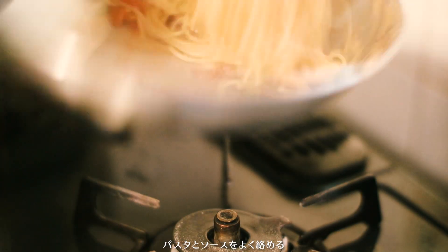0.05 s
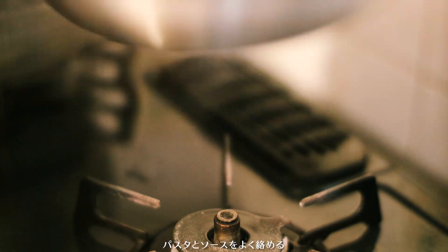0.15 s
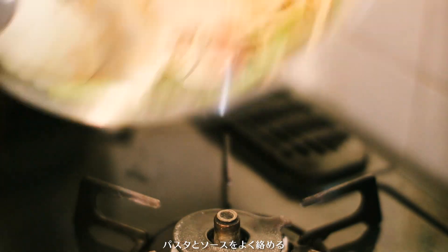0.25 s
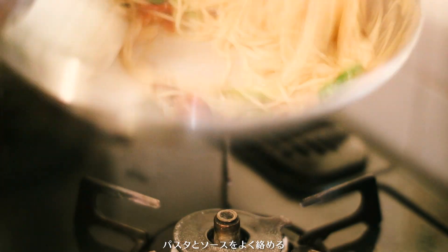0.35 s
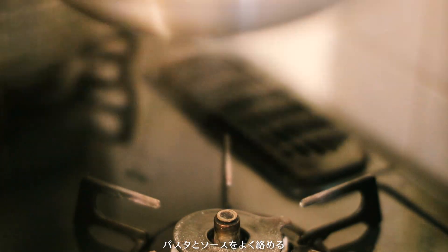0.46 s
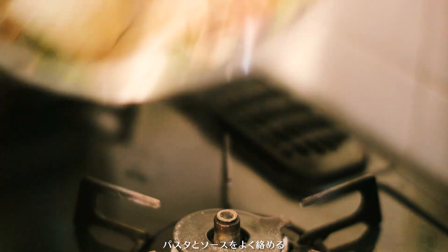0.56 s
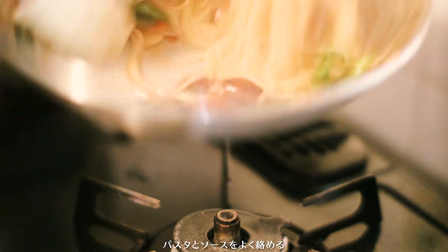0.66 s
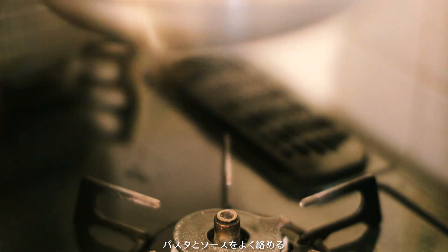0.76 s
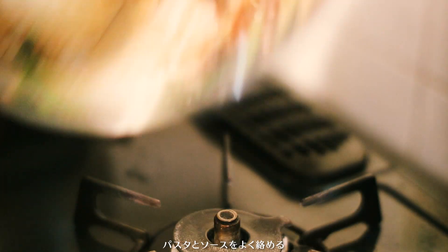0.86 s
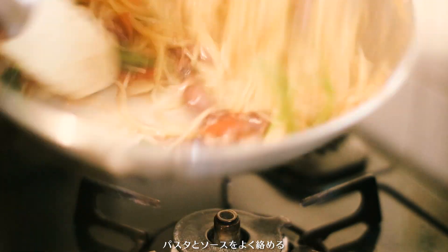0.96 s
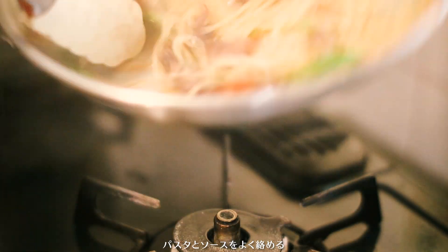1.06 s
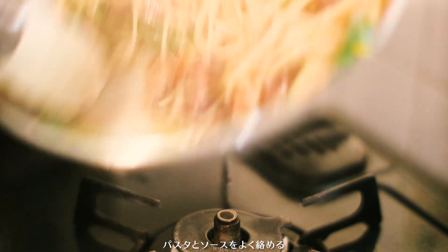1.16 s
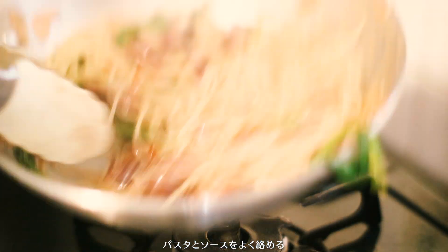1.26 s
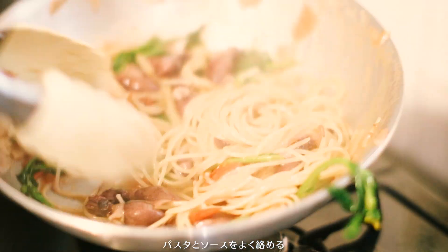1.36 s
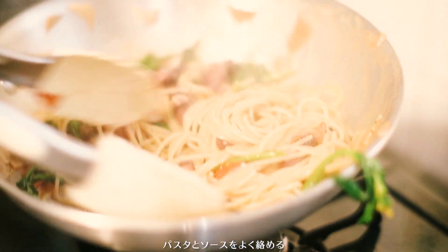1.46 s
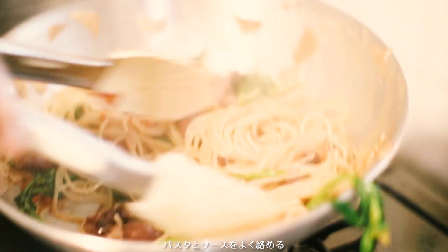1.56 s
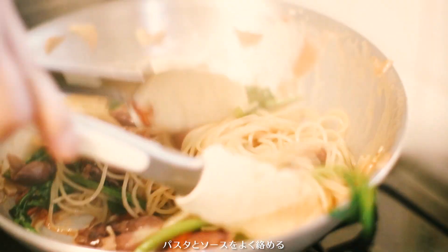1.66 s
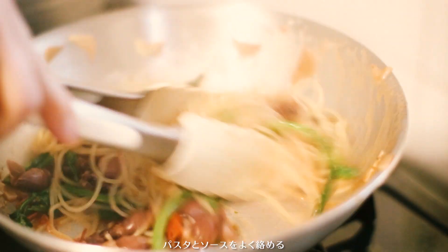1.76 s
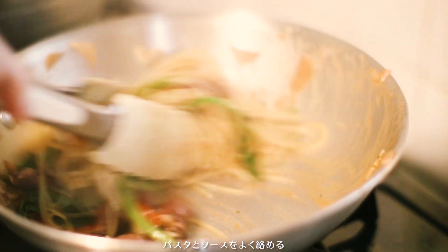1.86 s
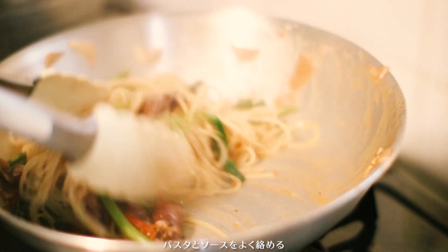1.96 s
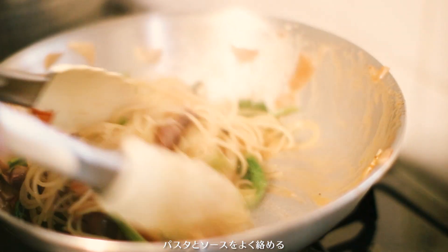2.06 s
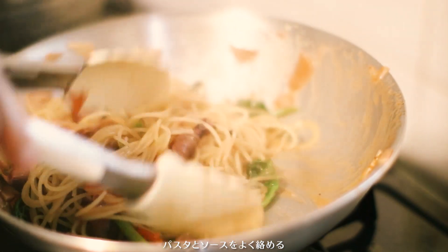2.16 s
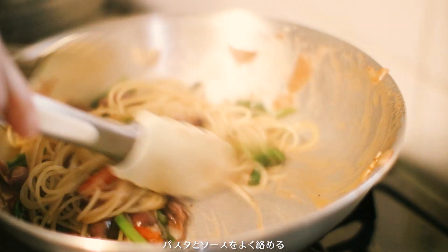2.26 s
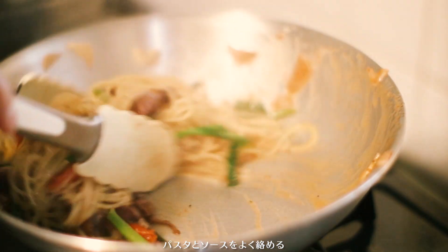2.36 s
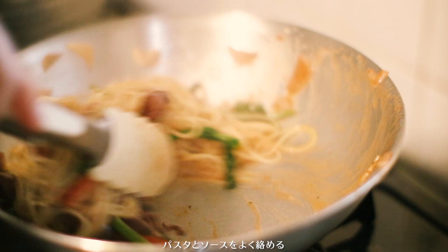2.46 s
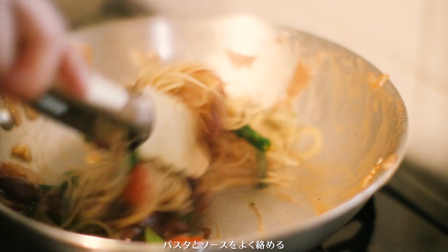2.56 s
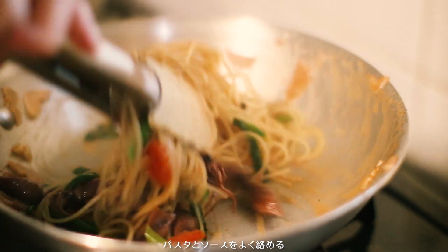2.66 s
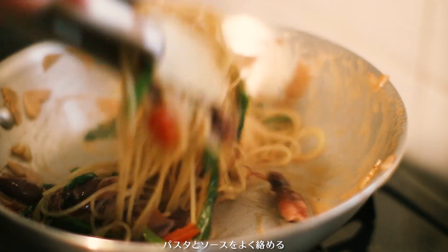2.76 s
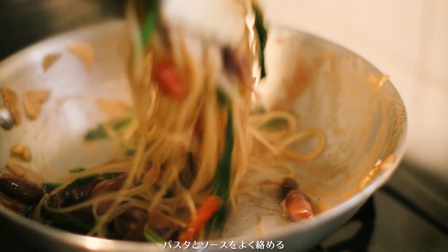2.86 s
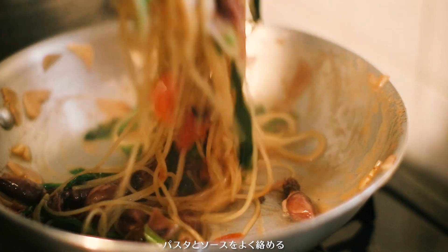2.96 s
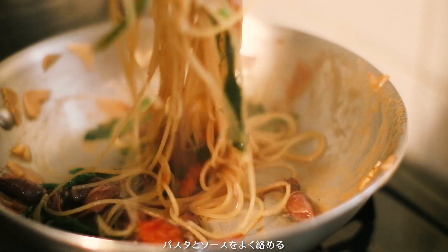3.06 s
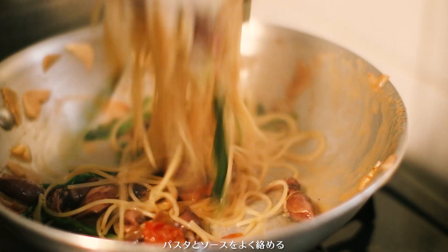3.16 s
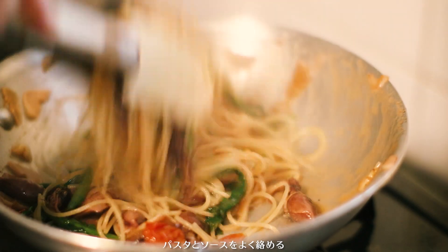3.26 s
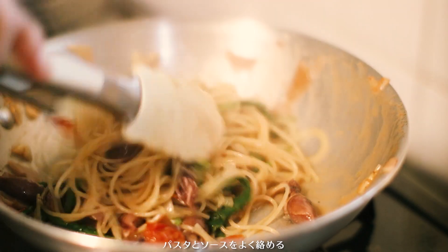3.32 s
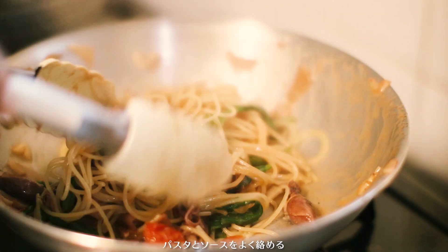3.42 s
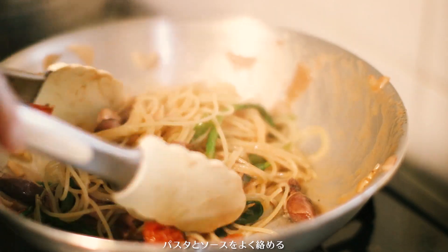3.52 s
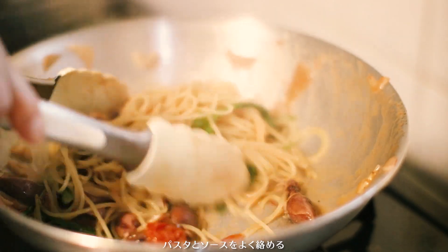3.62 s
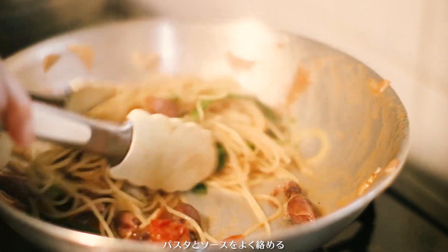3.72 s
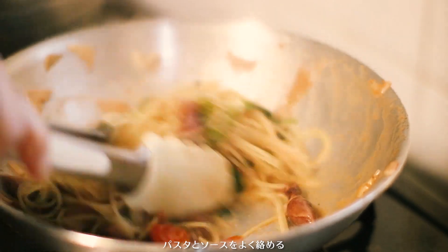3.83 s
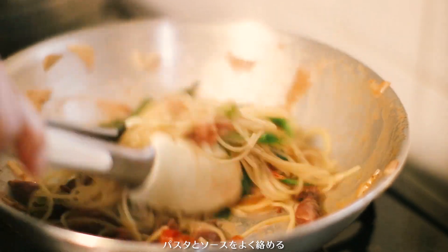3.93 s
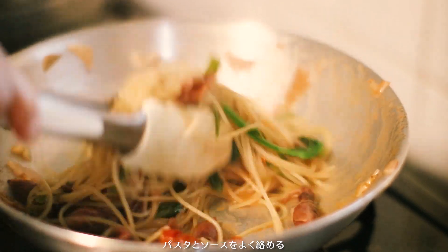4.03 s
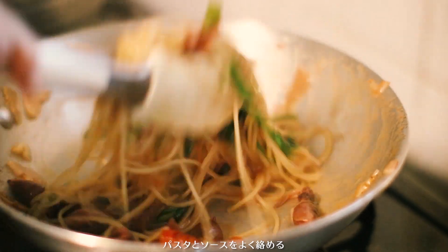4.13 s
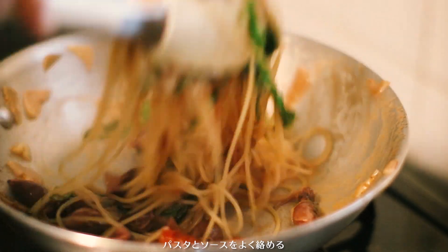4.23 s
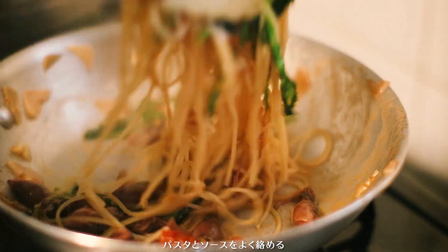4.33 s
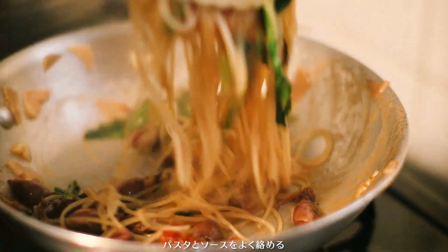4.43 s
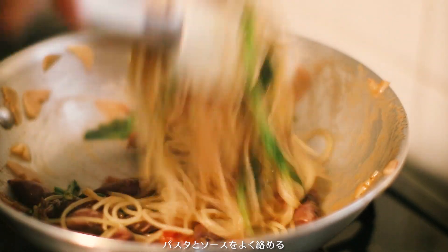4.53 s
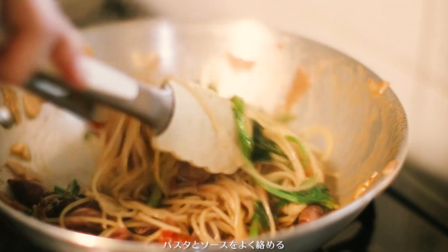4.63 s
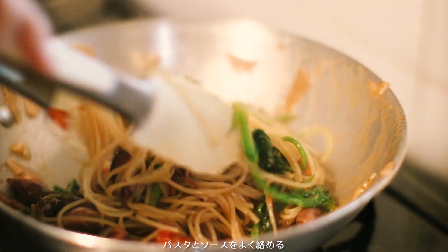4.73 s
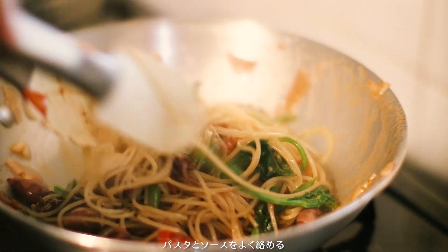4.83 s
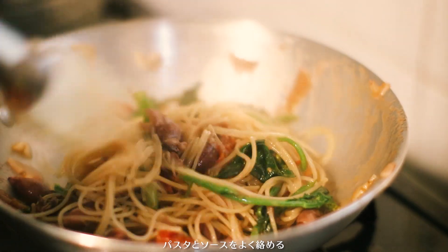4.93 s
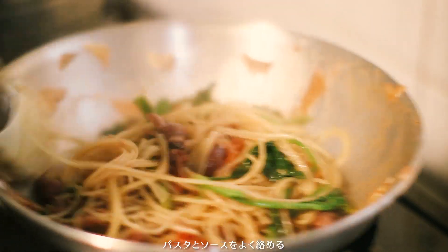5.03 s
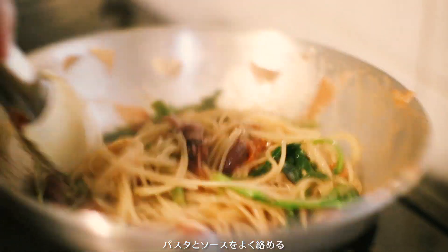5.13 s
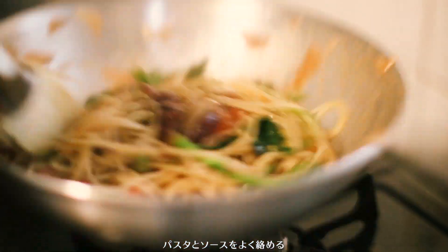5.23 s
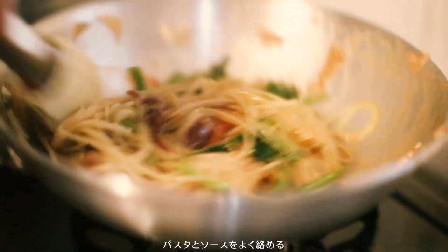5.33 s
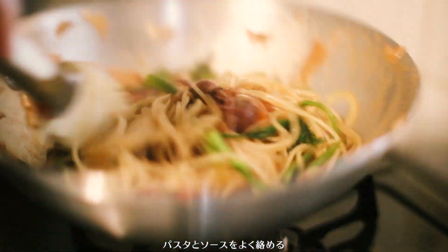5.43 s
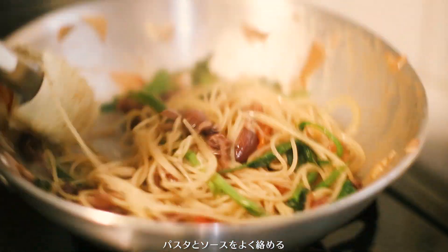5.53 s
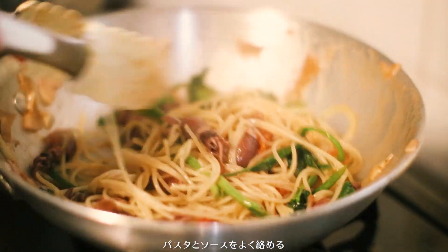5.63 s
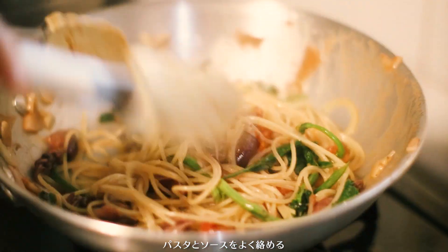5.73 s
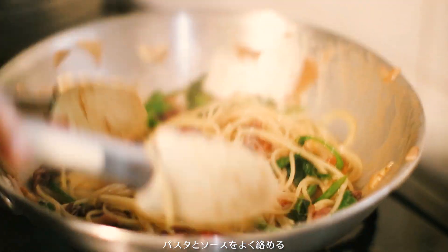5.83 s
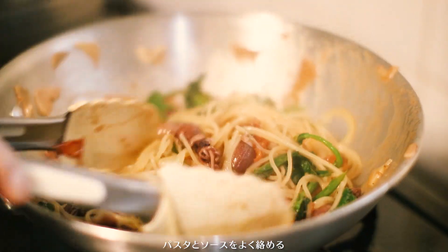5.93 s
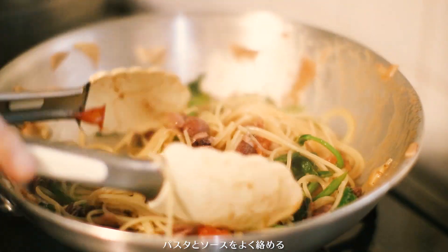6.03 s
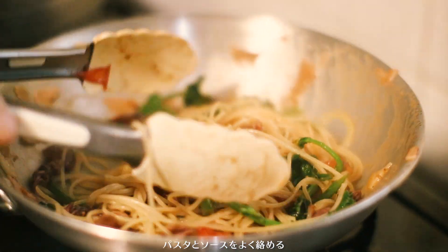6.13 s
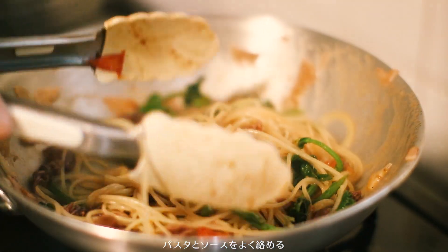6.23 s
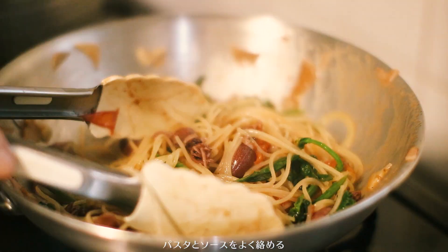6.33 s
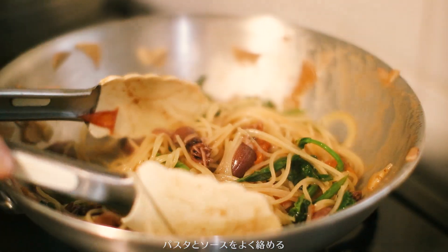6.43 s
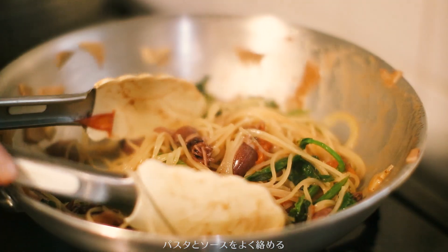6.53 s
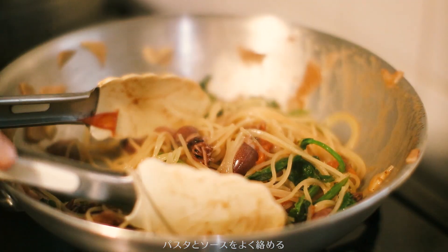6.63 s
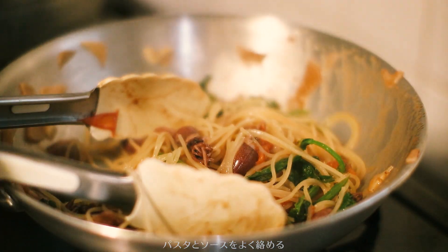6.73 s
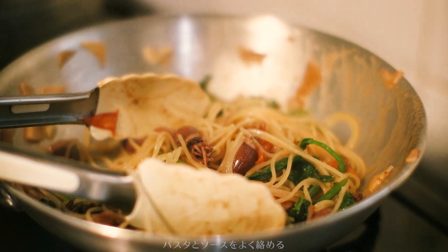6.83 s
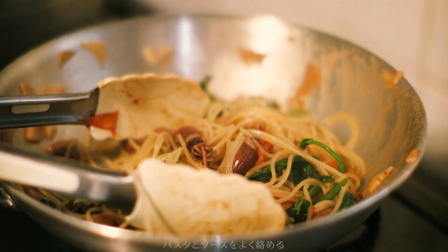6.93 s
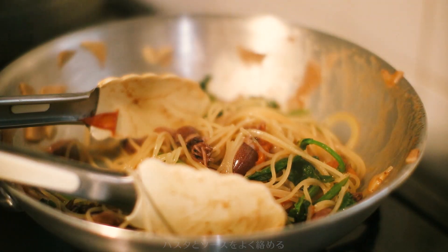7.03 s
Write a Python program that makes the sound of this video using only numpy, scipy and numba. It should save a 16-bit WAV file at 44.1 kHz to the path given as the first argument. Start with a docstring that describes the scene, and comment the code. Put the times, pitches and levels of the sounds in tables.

```python
"""Small tiled kitchen: pasta is tossed in a thin metal pan that knocks and drags on an iron grate.
Blows and stick-slip scrapes ring the pan's modes; grate and cooktop boom, tong arms ring and chatter.
Sauce slaps and fizzes as filtered clicks; a hood fan rushes and hums as shaped noise.
Decaying noise gives the room tail."""
import sys
import numpy as np
from scipy import signal
from scipy.fft import rfft, irfft, next_fast_len
from scipy.io import wavfile
from scipy.ndimage import uniform_filter1d
from numba import njit

SR = 44100
rng = np.random.default_rng(int(sys.argv[2]) if len(sys.argv) > 2 else 0)


def pcm_store(signal):
    """Save signal as 16-bit PCM."""
    levels = np.round(np.clip(np.atleast_2d(signal), -1, 1) * 32767)
    wavfile.write(sys.argv[1], SR, levels.astype(np.int16).T)


N = 312291
TIME = np.arange(N) / SR


def undb(db):
    """Decibels to gain."""
    return 10 ** (np.asarray(db) / 20)


def unit(x):
    """Scales to rms 1."""
    return x / np.sqrt(np.mean(x ** 2))


def decay(t, t60):
    """Exponential falling 60 dB in t60 seconds."""
    return np.exp(-np.log(1000) * t / t60)


def over_hz(table, hz):
    """Reads (frequency [Hz], value) rows on a log-frequency axis."""
    rows = np.array(table)
    return np.interp(np.log(hz + 1), np.log(rows[:, 0]), rows[:, 1])


def shaped(x, gain):
    """Applies a gain per frequency."""
    size = next_fast_len(N)
    hz = np.arange(size // 2 + 1) * SR / size
    return irfft(rfft(x, size) * gain(hz), size)[:N]


def band(x, lo_hz, hi_hz):
    """Butterworth band-pass."""
    return signal.sosfilt(signal.butter(3, [lo_hz, hi_hz], "band", fs=SR, output="sos"), x)


def walk(rate_hz):
    """Random levels held 1 / rate_hz seconds and slewed; rms near 1."""
    hold = int(SR / rate_hz)
    steps = np.repeat(rng.standard_normal(N // hold + 1), hold)
    return uniform_filter1d(steps, hold)[:N] * np.sqrt(3 / 2)  # slewing costs a third of the power


def grit(clicks_per_s, spread_db):
    """Random clicks; spread_db makes a few of them larger."""
    hit = rng.random(N) < clicks_per_s / SR
    boost = undb(spread_db * np.minimum(rng.exponential(size=N), 2))
    return hit * rng.standard_normal(N) * boost


def swell(start_s, rise_s, hold_s, fade_db_per_s, db):
    """Gain of one gesture: swell over RISE_DB, hold, fade."""
    t = TIME - start_s
    rise = RISE_DB * np.clip(1 - t / rise_s, 0, 1)
    fade = fade_db_per_s * np.maximum(t - rise_s - hold_s, 0)
    return (t > 0) * undb(db - rise - fade)


RISE_DB = 30


def rings(modes, gain, stretch, seconds):
    """The modes struck once, as a sum of decaying sines."""
    hz, db, t60 = np.transpose(modes)[:, :, None]
    t = np.arange(int(seconds * SR)) / SR
    strength = gain[:, None] * undb(db)
    return np.sum(strength * decay(t, t60 * stretch) * np.sin(2 * np.pi * hz * t), axis=0)


def spot(hz, centres_hz, octaves):
    """How near each frequency lies to those a contact spot favours; one bell per centre."""
    return sum(np.exp(-(np.log2((hz + 1) / centre) / octaves) ** 2) for centre in centres_hz)


@njit
def resonance(x, hz, sharpness):
    """State-variable band-pass with a moving centre; sharpness is its Q."""
    y = np.empty(len(x))
    band_state, low_state, damping = 0., 0., 1 / sharpness
    for i in range(len(x)):
        g = np.tan(np.pi * hz[i] / SR)
        v = (band_state + g * (x[i] - low_state)) / (1 + g * (g + damping))
        band_state = 2 * v - band_state
        low_state += 2 * g * v
        y[i] = damping * v
    return y


# fan rush spectrum, relative: (frequency [Hz], density [dB per Hz])
HOOD_SPECTRUM = [(15, -46), (25, -11.5), (53, -16.5), (103, -7), (220, -10.5), (584, -1.5), (1150, -2),
                 (1250, -4), (1550, -5.5), (2460, -14), (3320, -15.5), (7710, -29), (11600, -26),
                 (15200, -38), (16500, -45)]
HOOD_DB = -41.5
HUM_HZ, HUM_WIDTH_HZ, HUM_DB = 105.3, 19, -62.5


def hood():
    """Fan rush as steady shaped noise; wavering motor hum as narrow-band noise."""
    rush = shaped(rng.standard_normal(N), lambda hz: undb(over_hz(HOOD_SPECTRUM, hz)))
    hum = band(rng.standard_normal(N), HUM_HZ - HUM_WIDTH_HZ / 2, HUM_HZ + HUM_WIDTH_HZ / 2)
    return undb(HOOD_DB) * unit(rush) + undb(HUM_DB) * unit(hum)


# wet pasta landing and sliding:
# (start [s], rise [s], hold [s], fade [dB/s], level [dB], brightness [dB])
SLAPS = [(0.131, 0.027, 0.039, 1500, -30, -3.5), (0.426, 0.033, .012, 520, -35.5, 0),
         (0.716, 0.052, 0.016, 400, -35, -0.5), (1.036, 0.048, .005, 400, -29, -1),
         (1.304, .018, .004, 350, -50, 1), (3.337, 0.041, .07, 260, -54, -2),
         (3.635, .014, .004, 160, -65, 7), (3.74, 0.046, .01, 100, -46.5, -4),
         (3.923, 0.018, .02, 29, -60.5, 1), (4.604, .025, .02, 107, -55.5, -1),
         (6.397, 0.02, .01, 301, -63, 13)]
DRIP_DB, DRIP_SWING_DB = -69.5, 3.5


def sauce(clicks_per_s=3900.0, spread_db=0.0):
    """Wet crackle of sauce films tearing: a constant faint fizz, swelling with each slap."""
    fizz = grit(clicks_per_s, spread_db)
    dull = unit(band(fizz, 2640, 7660))
    bright = unit(band(fizz, 6720, 15300))
    out = undb(DRIP_DB + DRIP_SWING_DB * walk(12)) * (dull + bright)
    for *gesture, bright_db in SLAPS:
        out += swell(*gesture) * (dull + undb(bright_db) * bright)
    return out


# pan modes; blows and scrapes scale the decay:
# (frequency [Hz], level [dB], base t60 [s])
PAN_MODES = [(361, -9.5, 0.44), (447, 1, 0.2), (580, -1.5, 0.1), (670, -1, 0.15), (773, 5.5, 0.15),
             (869, 1, 0.19), (990.6, -11, 0.17), (1148, 11.5, 0.04), (1443, 12, 0.032), (1522, -10, .12),
             (1640, -10.5, 0.016), (1860, 5.5, 0.026), (2121, 3, 0.055), (2010, -6.5, 0.04),
             (2550, 4, 0.012), (2510, 8, 0.11), (2870, -7, 0.059), (2990, -23, 0.023), (3090, 7, 0.069),
             (3440, -33, 0.051), (3590, -38.5, 0.027), (3974, 12, 0.019), (4350, 6, 0.025),
             (4770, 1.5, 0.053), (5360, 0, 0.13), (5870, 8, 0.023), (7100, 6, 0.026), (8300, -23, 0.085)]
# knocks: (time [s], level [dB], low favoured [Hz], high favoured [Hz], thud [dB], clang [dB],
# tick [dB], ring length factor [1], ring trim [dB])
BLOWS = [(0.1453, -27.5, 1000, 4080, -4, 12, -6, 0.97, -12),
         (0.1874, -7.5, 1260, 3936, -22.5, -8.5, -9, 1, -6),
         (0.4754, -27.5, 790, 5100, -11, 8.5, 5.5, 0.47, -10),
         (0.7777, -44, 880, 5280, 13, 40.5, 21.5, 0.15, -3),
         (1.077, -25.5, 1270, 4100, -15, 7, -7, 0.45, -2),
         (1.4476, -6.5, 1526, 4230, -86, 4.5, -12.5, 0.45, 2),
         (1.7275, -12.5, 920, 2670, 6, 10, -9, 0.71, -6), (1.7964, -4, 917, 4030, 0, -3, -20, 0.3, 0),
         (1.9505, -17, 990, 5300, 1, -7, -10, 0.52, 1.5), (1.9628, 0, 982, 2630, -6, -1, -20, 0.5, -11.5),
         (2.1117, -12, 1010, 2450, -5, -36, -27, 0.38, -12),
         (2.39, -22, 810, 2550, -10, -7, -17, 0.52, -13),
         (2.4369, -14.5, 1200, 2670, 3, -8, -25, 0.23, -21),
         (2.5162, -18.5, 2160, 2380, -18, -14, -29, 0.36, -3),
         (2.56, -36, 904, 3130, -15, 13.5, -10, 0.2, -6), (2.61, -17, 1530, 2300, -3, -12, -24, 0.17, 1),
         (2.7566, -16.5, 880, 2400, -20, -24, -16, 0.27, -4),
         (3.7919, -2, 1434, 2660, -13, -8.5, -37, 0.45, -17), (5.1013, -19, 888, 2760, 5, -9, -9, 0.96, -4),
         (5.1428, -10.5, 1456, 4320, -10, 1, -23, 0.43, -0.5),
         (5.2331, -9, 1580, 2920, -27, 10, -9, 0.75, -6), (5.677, 0, 2280, 4036, -40, -1, -21, 0.32, -1.5),
         (5.7727, -10.5, 990, 2440, -31, -9, -39, 0.19, 7),
         (5.8601, -18.5, 1414, 2560, -31, 5.5, -14, 0.76, -6),
         (5.9333, -9, 872, 4250, -6, 11.5, -4.5, 0.19, -0.5),
         (6.0261, -0.5, 910, 3140, 2, -32, -31, 0.19, -12),
         (6.2365, -11, 1360, 3180, -0.5, 3.5, -29, 0.41, -15),
         (6.5839, -13, 1843, 4620, -17, -5.5, 4.5, 0.77, 1)]
# centres of thud, middle, clang, tick: (frequency [Hz] x 4)
COLOUR_HZ = (450, 1600, 3900, 9000)


def blows(focus_db=17.5, focus_octaves=0.031, crack_s=0.0081, crack_focus_db=7.0, crack_octaves=0.13,
          contact_s=0.0013, snap_db=0.0, snap_s=0.0014):
    """Each knock rings the modes nearest its spot, under a snap and a short noise crack."""
    out = np.zeros(N + SR)
    hz = np.array(PAN_MODES)[:, 0]
    t = np.arange(2048) / SR
    bins_hz = np.fft.rfftfreq(len(t), 1 / SR)
    for start_s, db, low_hz, high_hz, thud, clang, tick, stretch, trim_db in BLOWS:
        colour = list(zip(COLOUR_HZ, (thud, 0, clang, tick)))
        favoured_hz = (low_hz, high_hz)
        ring_db = over_hz(colour, hz) + focus_db * spot(hz, favoured_hz, focus_octaves) + trim_db
        polarity = np.sign(rng.standard_normal(len(hz)))
        sound = .3 * rings(PAN_MODES, undb(ring_db) * polarity, max(stretch, .05), .3)

        crack_focus = crack_focus_db * (spot(bins_hz, favoured_hz, crack_octaves) - .5)
        crack_db = over_hz(colour, bins_hz) + crack_focus
        noise = irfft(rfft(rng.standard_normal(len(t))) * undb(crack_db))
        sound[:len(t)] += noise * (np.exp(-t / crack_s) + undb(snap_db) * np.exp(-t / snap_s))

        # the push takes a moment to build
        sound *= 1 - np.exp(-np.arange(len(sound)) / (SR * contact_s))
        start = int(start_s * SR)
        out[start:start + len(sound)] += undb(db) * sound
    return out[:N]


# steel arm modes: (frequency [Hz], level [dB], t60 [s])
TONG_MODES = [(1251, -2.5, 0.17), (1725, -0.5, 0.078), (1860, -17, 0.11), (2030, -31, 0.14),
              (2260, -35, .2), (2774, -7.5, 0.097), (2880, -24, 0.089), (3720, -9, 0.1), (3970, -12, 0.11),
              (5100, -27, 0.041), (4890, -7, 0.11), (5300, -14, 0.028), (5780, -4, 0.04), (6030, -8, 0.044),
              (6830, -13, 0.03), (7330, -15, 0.097), (8080, -26, 0.095), (8640, -15, 0.1)]
# arms clacking: (time [s], level [dB], tilt [dB per octave])
CLACKS = [(0.1867, -19.5, 1), (6.5816, -23.5, 4)]


def clacks(chatter_db=-20.5, chatter_s=0.02, splash_db=5.5, splash_s=0.028):
    """Tongs ring while loose arms chatter on; a harder contact favours their upper modes."""
    out = np.zeros(N)
    hz = np.array(TONG_MODES)[:, 0]
    t = np.arange(int(.45 * SR)) / SR
    polarity = (-1.) ** np.arange(len(hz))
    for start_s, db, tilt_db in CLACKS:
        tilt = undb(tilt_db * np.log2(hz / hz[0]))
        ring = rings(TONG_MODES, tilt * polarity, 1, .45)
        noise = rng.standard_normal(len(t))
        chatter = signal.fftconvolve(noise * np.exp(-t / chatter_s), ring)[:len(t)]
        splash = band(noise, 2500, 8800) * np.exp(-t / splash_s)
        sound = ring + undb(chatter_db) * chatter + undb(splash_db) * splash
        start = int(start_s * SR)
        out[start:start + len(t)] += undb(db) * sound
    return out


# pan base over the grate: (start [s], rise [s], hold [s], fade [dB/s], level [dB], thud [dB],
# clang [dB], tick [dB], hollow [dB], initial hollow [Hz], initial squeal [Hz], glide [octaves/s])
STROKES = [(1.462, 0.022, 0.094, 296, -32, -17, 7, -8, -22, 600, 4210, -4),
           (1.713, 0.013, 0.046, 200, -16.5, -2, -6, -17, -7, 830, 2920, -0.5),
           (1.784, .015, 0.042, 300, -19.5, -1, -4.5, -14.5, -2, 910, 3100, 0),
           (1.923, 0.04, 0.047, 424, -17.5, -3.5, -4, -18.5, -3.5, 897, 2820, 0.1),
           (2.104, .005, .015, 220, -42, 5.5, -7, -22, 7, 880, 2770, 1.5),
           (2.376, .018, 0.013, 250, -35, -2.5, -3.5, -14, -1.5, 780, 2620, -5.5),
           (2.415, 0.016, 0.018, 350, -40, 8, 0, -22, -2, 910, 2730, -1),
           (2.605, .012, .045, 450, -28.5, -3.5, -9.5, -20, -8.5, 780, 2740, -4),
           (2.747, .006, .03, 100, -49, -13, -2.5, -9, -3, 880, 3150, -1.5),
           (3.797, 0.0026, .005, 560, -17, -17, -6, -16, -9.5, 845, 2900, 3),
           (5.079, 0.021, 0.026, 202, -20.5, 2, -0.5, -10, -1.5, 740, 4450, 3.5),
           (5.133, 0.016, 0.064, 161, -18, -8, -3.5, -20.5, -8, 826, 3300, -1.7),
           (5.222, .005, 0.029, 251, -23.5, -22, -1, 0, -10, 787, 3860, -0.5),
           (5.286, 0.028, 0.015, 357, -39.5, -13, 12, -17, -15, 610, 3300, -1.2),
           (5.671, 0.0036, .01, 250, -23, -21, 3.5, -3, -7, 915, 3640, 1),
           (5.698, .015, 0.085, 400, -34.5, -11, -8, -27, 5.5, 880, 3300, 0.1),
           (5.849, 0.0067, 0.019, 255, -26, -16, 3, -7.5, -10, 1410, 2720, -0.7),
           (5.924, 0.0089, 0.045, 302, -12.5, -6, -7, -12.5, -15, 680, 3460, -2),
           (5.999, 0.029, 0.024, 271.5, -23.5, -3.5, 0, -13.5, -11, 830, 3340, -3),
           (6.233, 0.0026, 0.003, 268, -36, 7, 0, -28, -2, 577, 3600, 2),
           (6.586, 0.0025, 0.018, 314, -24.5, -2.5, 2.5, -1, -28, 614, 4330, 1.5)]
# fade-rate factors: (thud [1], middle [1], clang [1], tick [1], hollow [1])
FADE_SHARES = (0.98, 0.88, 0.95, 1.05, 1.22)
# inner edges of thud, middle, clang, tick: (frequency [Hz] x 3)
BAND_EDGES_HZ = (1000, 2500, 6000)


def scrapes(clicks_per_s=5000., spread_db=3.0, rasp=0.14, damping=0.15, patchy_db=6.5, squeal_gain=1.55,
            judder_db=1.5, drift=0.021):
    """Dense stick-slip clicks ring the pan, damped by the grate, over their own dry rasp."""
    slips = grit(clicks_per_s, spread_db) * undb(judder_db * walk(110))
    body = 0
    for hz, mode_db, t60 in PAN_MODES:
        sharpness = np.pi * hz * t60 * damping / np.log(1000)
        # the base rocks over the bars and catches each mode unevenly
        caught = slips * undb(patchy_db * walk(35))
        moving_hz = hz * (1 + drift * walk(25))
        body = body + undb(mode_db) * unit(resonance(caught, moving_hz, sharpness))
    sound = unit(body) + rasp * unit(slips)

    # the contact spot wanders, and with it the region that sings loudest
    rows = np.array(STROKES)
    now = rows[np.maximum(np.searchsorted(rows[:, 0], TIME) - 1, 0)].T
    glide = 2 ** (now[-1] * np.clip(TIME - now[0], 0, .2))
    hollow_hz, squeal_hz = now[-3] * glide, now[-2] * glide
    hollow = unit(resonance(resonance(slips, hollow_hz, 3.9), hollow_hz, 3.3))
    squeal = unit(resonance(resonance(slips, squeal_hz, 2.06), squeal_hz, 2.3))

    edges = (200, *BAND_EDGES_HZ, 14500)
    low, middle, high, top = (unit(band(sound, lo, hi)) for lo, hi in zip(edges, edges[1:]))
    parts = (low, middle, unit(high + squeal_gain * squeal), top, hollow)
    out = 0
    for start_s, rise_s, hold_s, fade, db, thud, clang, tick, hollow_db, *_ in STROKES:
        levels_db = (thud, 0, clang, tick, hollow_db)
        for part, part_db, share in zip(parts, levels_db, FADE_SHARES):
            out = out + part * swell(start_s, rise_s, hold_s, share * fade, db + part_db)
    return out


# grate bars and cooktop sheet: (time [s], level [dB], frequency [Hz], t60 [s])
BOOMS = [(1.509, -33.5, 318, 0.19), (2.758, -28, 870, 0.075), (5.244, -29, 330, 0.43),
         (5.705, -13.5, 893, 0.17), (5.778, -25, 873, 0.13), (5.862, -28, 1327, 0.21),
         (6.591, -25.5, 186.6, 0.62), (6.601, -26, 339, 0.2)]


def booms(rise_s=0.0091):
    """Grate and cooktop ring a moment after the pan touches: slow-starting decaying sines."""
    out = np.zeros(N)
    for start_s, db, hz, t60 in BOOMS:
        t = np.maximum(TIME - start_s, 0)
        rise = 1 - np.exp(-t / rise_s)
        out += undb(db) * rise * decay(t, t60) * np.sin(2 * np.pi * hz * t)
    return out


# room decay: (frequency [Hz], t60 [s])
KITCHEN_T60 = [(200, 0.33), (1000, 0.2), (4000, 0.18), (12000, 0.2)]


def kitchen(x):
    """Diffuse tail from tiles and steel: decaying octave bands of noise; the lows last longest."""
    t = np.arange(int(.5 * SR)) / SR
    tail = np.zeros(len(t))
    for hz in 115 * 2 ** np.arange(8.):
        noise = rng.standard_normal(len(t))
        octave = band(noise, hz / np.sqrt(2), min(hz * np.sqrt(2), .45 * SR))
        tail += octave * decay(t, over_hz(KITCHEN_T60, hz))
    tail *= 1 - np.exp(-t / 0.0072)
    return signal.fftconvolve(x, tail / np.sqrt(np.sum(tail ** 2)))[:N]


# stereo width: (frequency [Hz], side minus mid [dB])
WIDTH = [(60, -23), (110, -0.5), (200, 0.5), (380, 2.5), (700, -2.5), (1290, -7.5), (2380, -7.5),
         (4400, -6.5), (8120, -1), (15000, 0.5)]
QUADRATURE = .3  # power share of the side that is the mid a quarter turn ahead
WET_DB = -4
LOW_HZ, HIGH_HZ = 148, 13000  # a thin pan radiates no deep bass; soft contacts dull the top


def scene():
    """Mid signal, and a side that is part phase-shifted mid, part unrelated room and fan."""
    pan = band(sauce() + blows() + clacks() + scrapes(), LOW_HZ, HIGH_HZ) + booms()
    mid = undb(-2.0) * (pan + undb(WET_DB) * kitchen(pan)) + hood()
    other = undb(-1) * kitchen(pan) + hood()
    side = shaped(mid, lambda hz: 1j * np.sqrt(QUADRATURE) * undb(over_hz(WIDTH, hz)))
    side += shaped(other, lambda hz: np.sqrt(1 - QUADRATURE) * undb(over_hz(WIDTH, hz)))
    return np.array([mid + side, mid - side])


TOP_HZ = 16500


def record(dry):
    """Soft saturation rounds only the loudest peaks; a steep low-pass cuts the top."""
    rounded = dry / (1 + (dry / .86) ** 6) ** (1 / 6)
    return signal.sosfilt(signal.ellip(10, .2, 80, TOP_HZ, fs=SR, output="sos"), rounded)


dry = scene()
out = record(dry)
pcm_store(out)
```